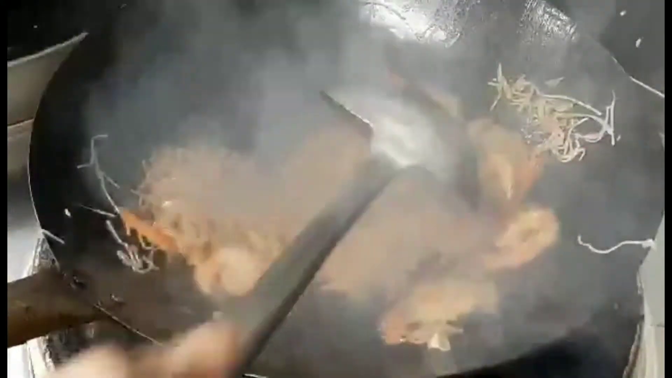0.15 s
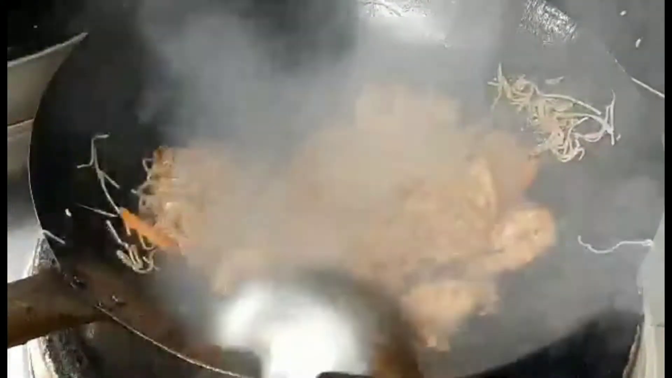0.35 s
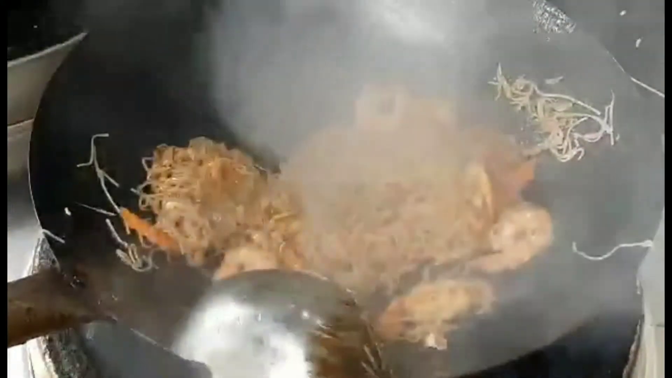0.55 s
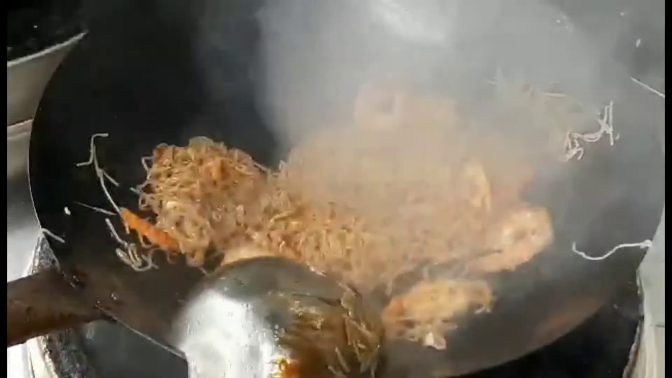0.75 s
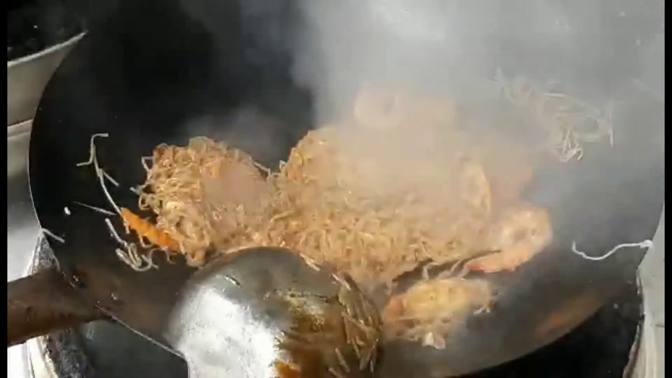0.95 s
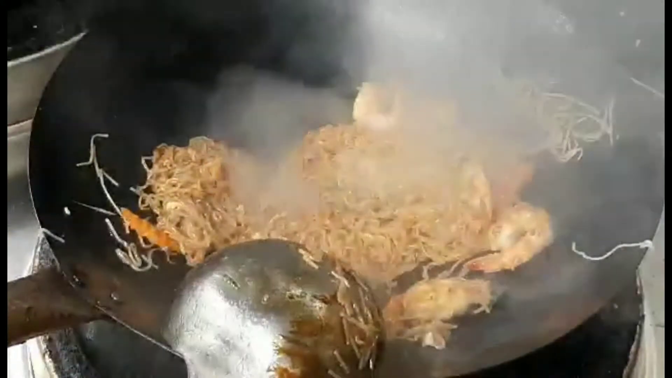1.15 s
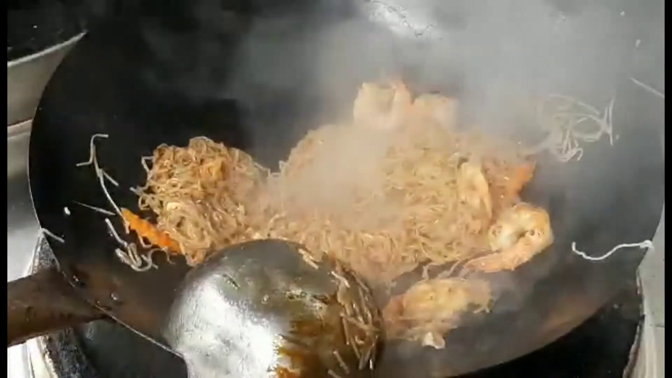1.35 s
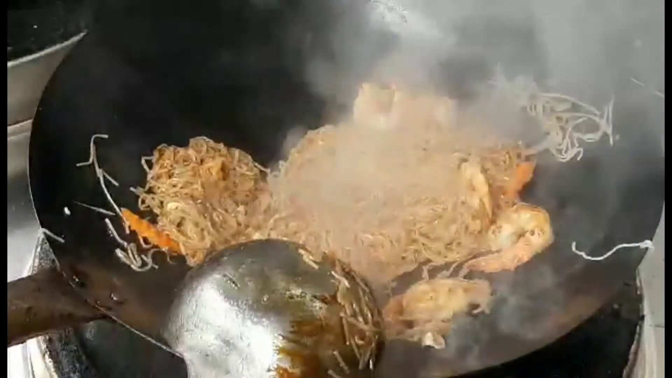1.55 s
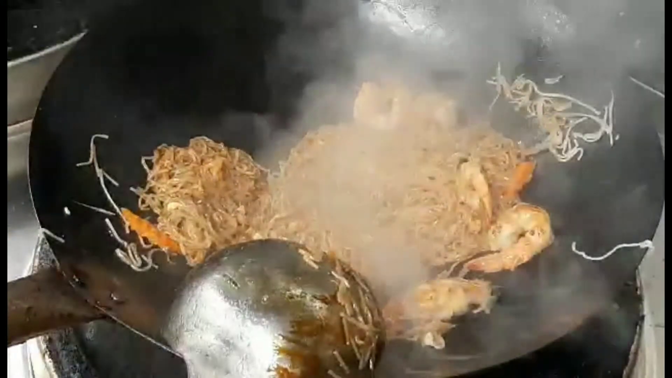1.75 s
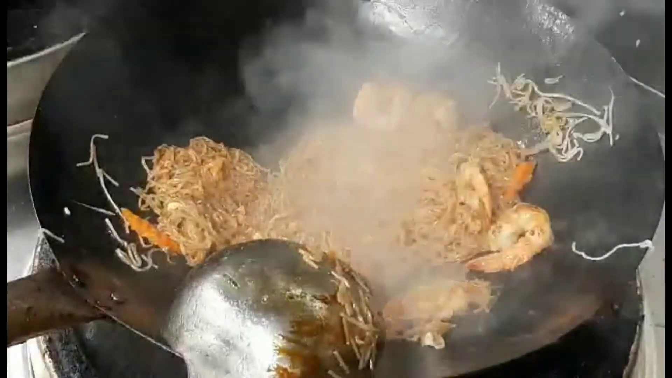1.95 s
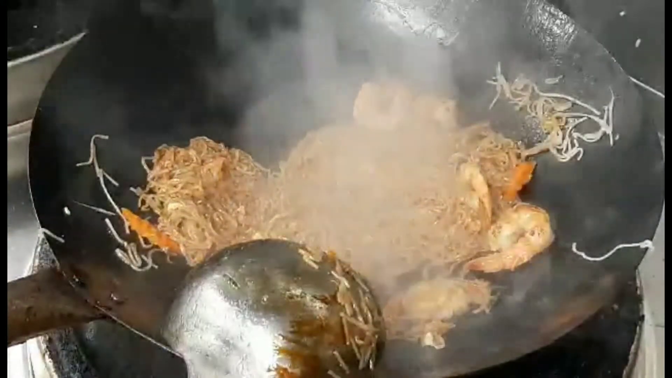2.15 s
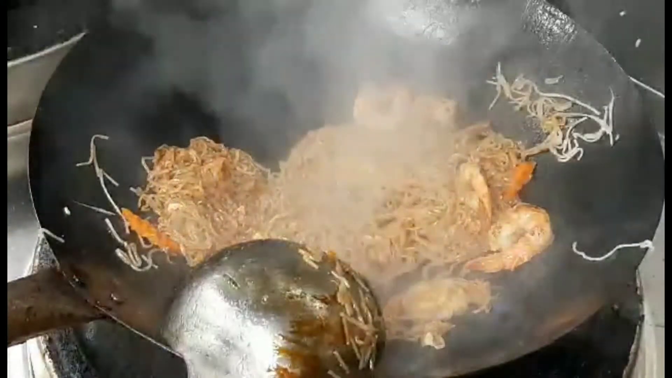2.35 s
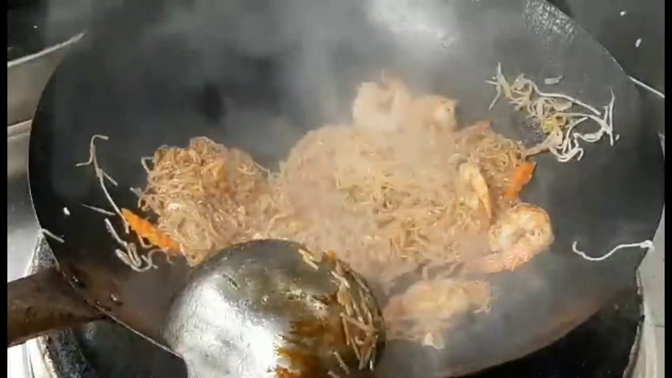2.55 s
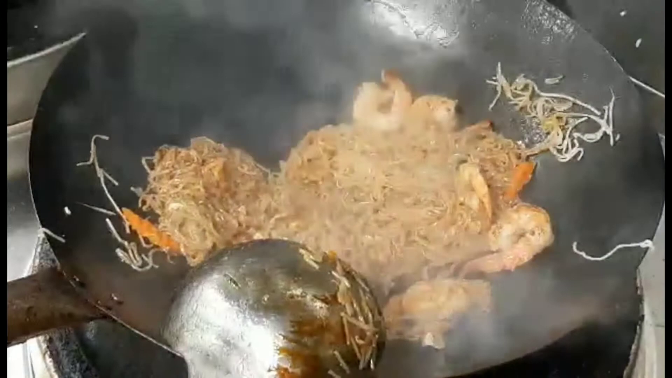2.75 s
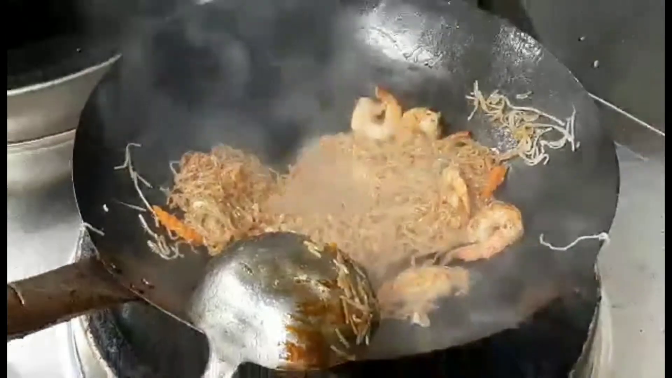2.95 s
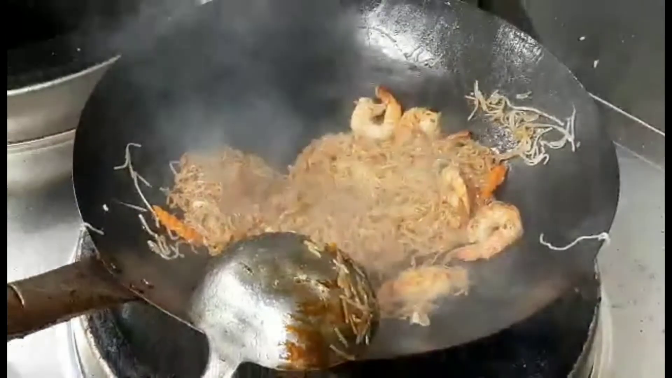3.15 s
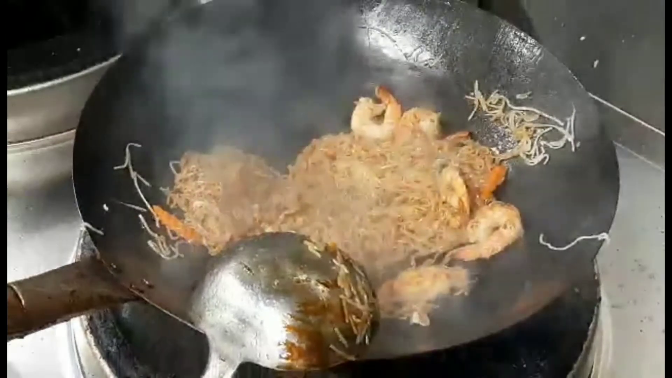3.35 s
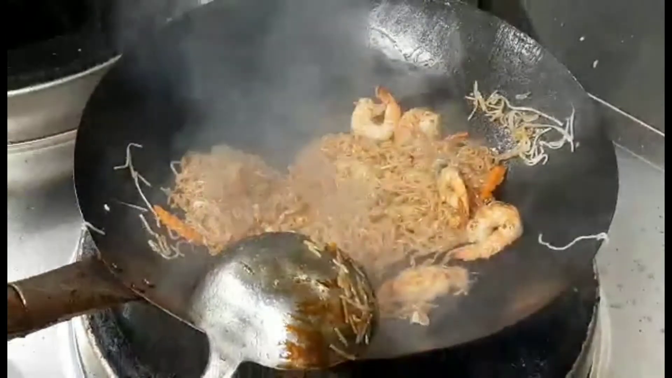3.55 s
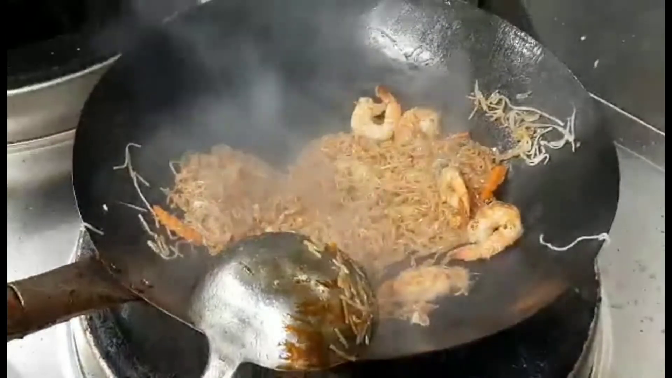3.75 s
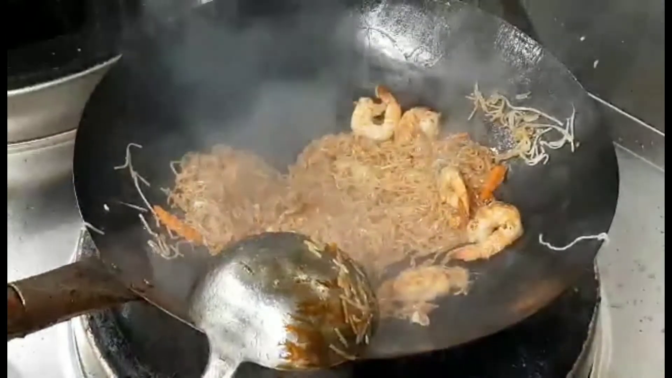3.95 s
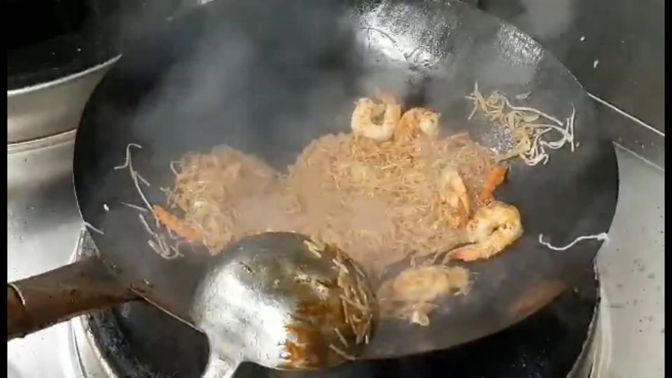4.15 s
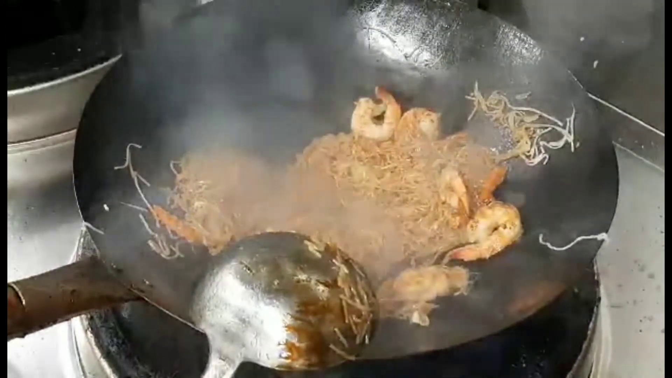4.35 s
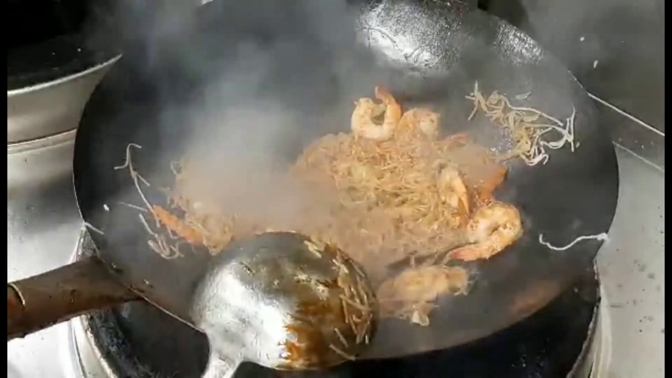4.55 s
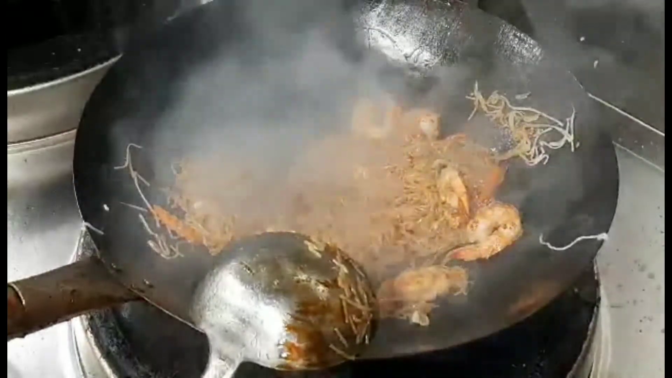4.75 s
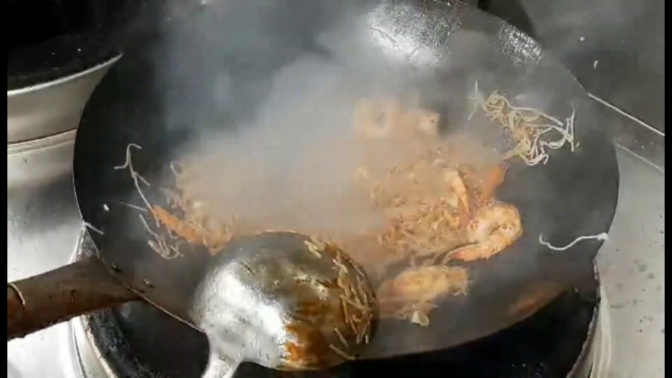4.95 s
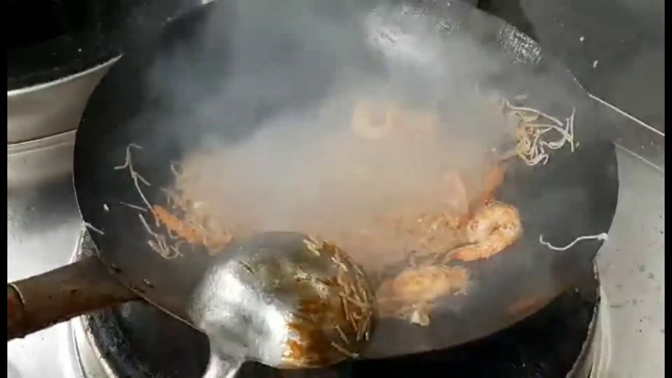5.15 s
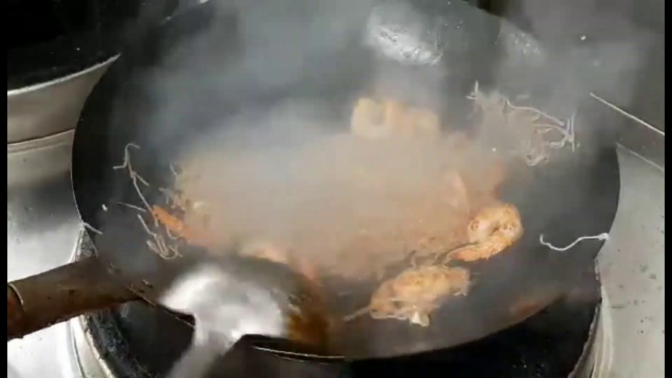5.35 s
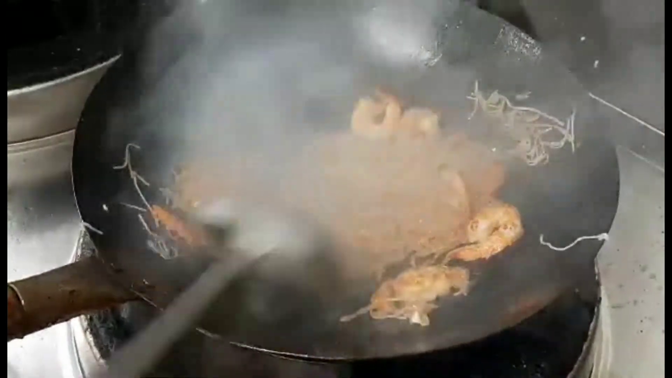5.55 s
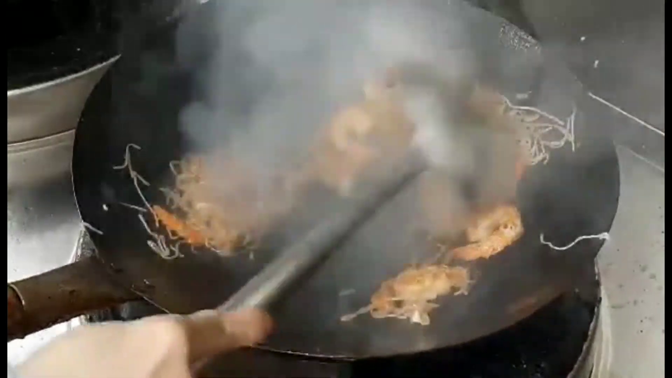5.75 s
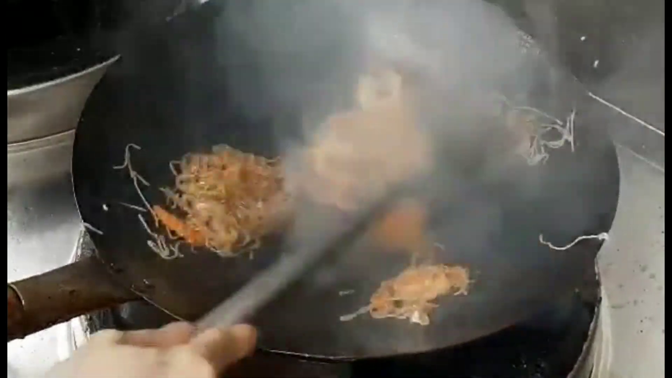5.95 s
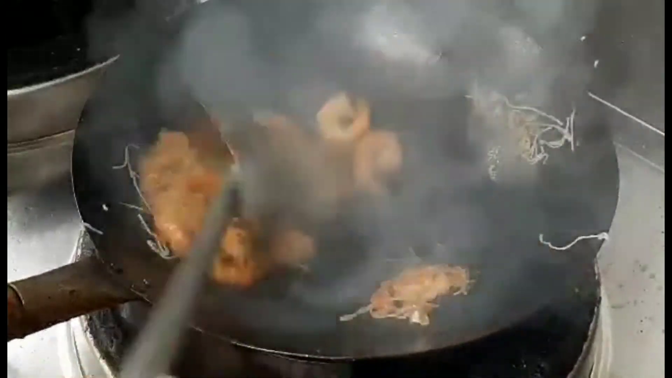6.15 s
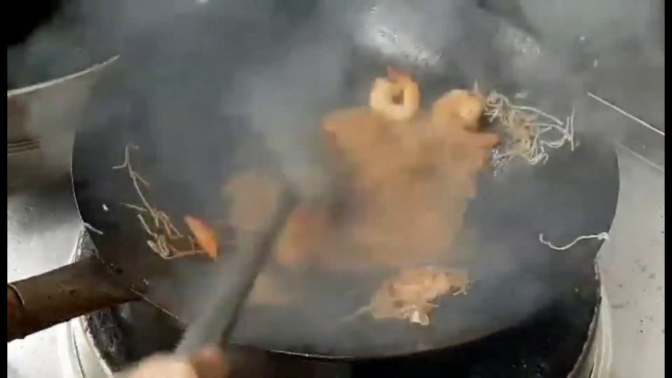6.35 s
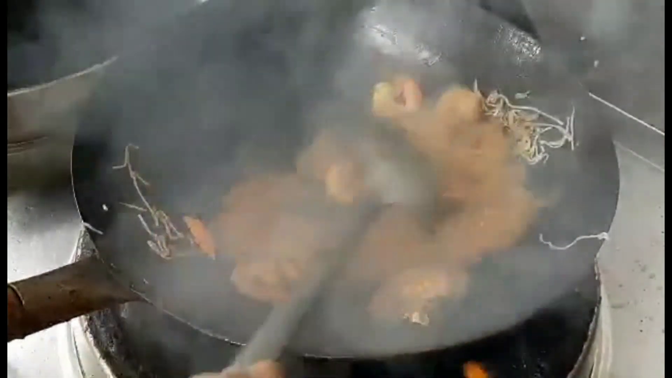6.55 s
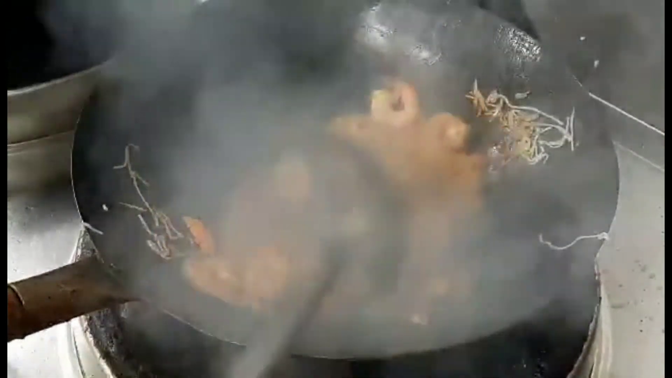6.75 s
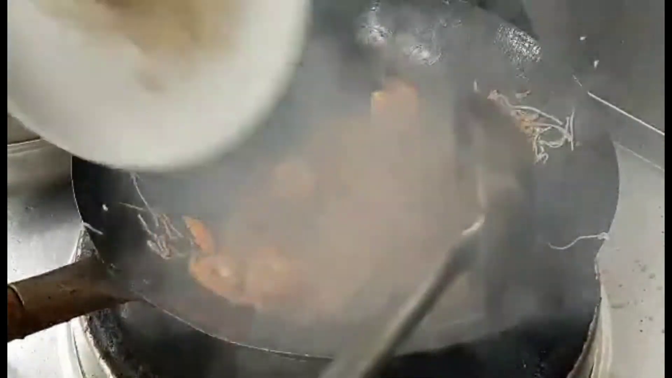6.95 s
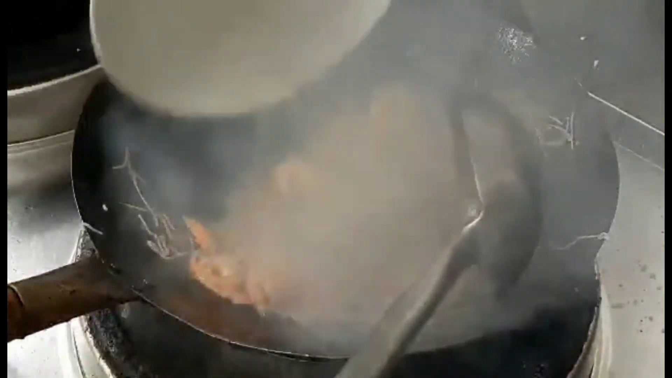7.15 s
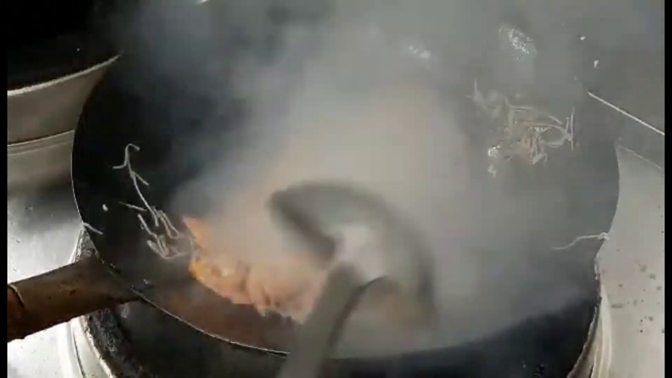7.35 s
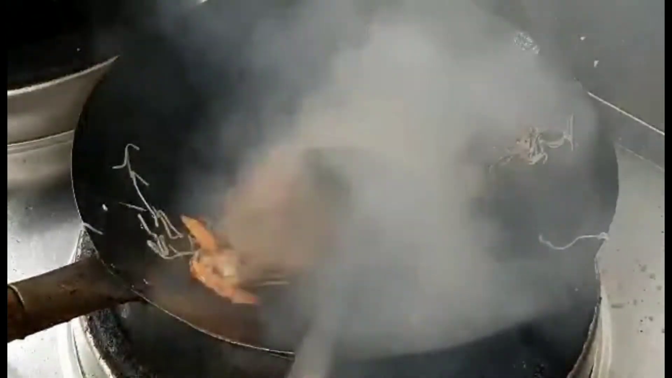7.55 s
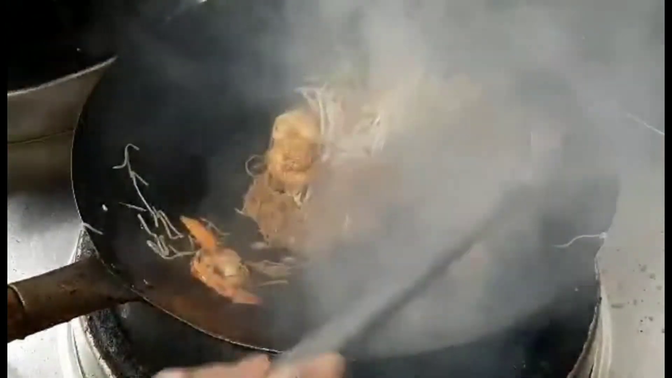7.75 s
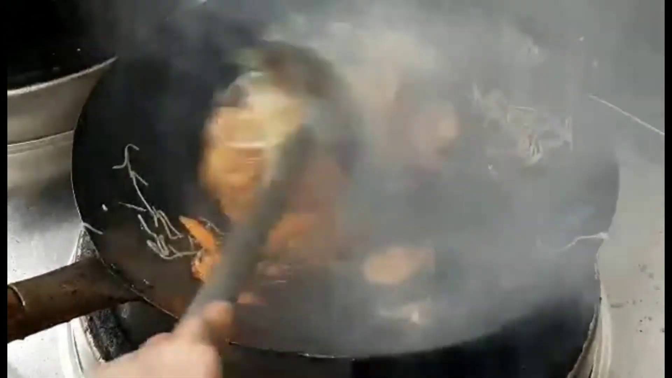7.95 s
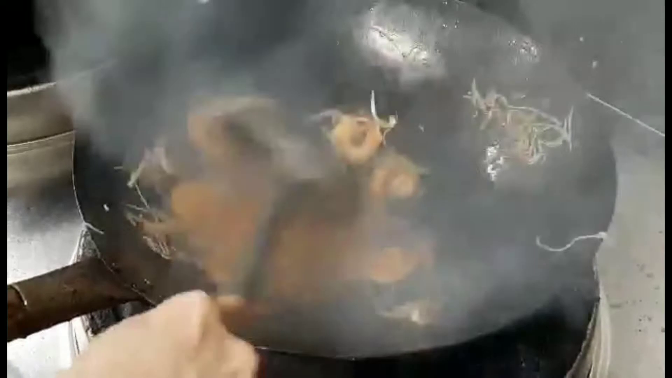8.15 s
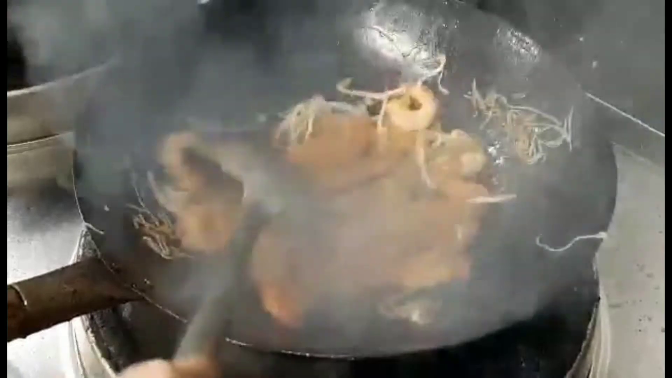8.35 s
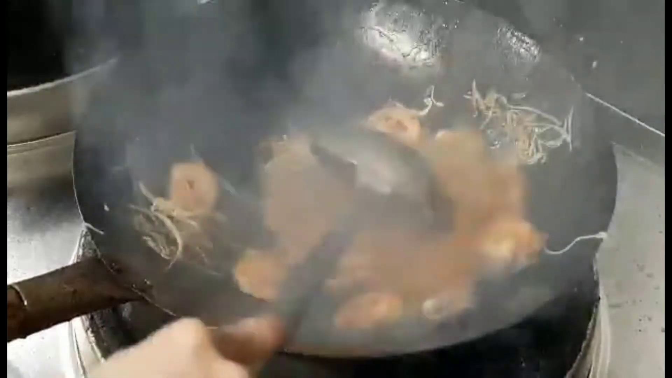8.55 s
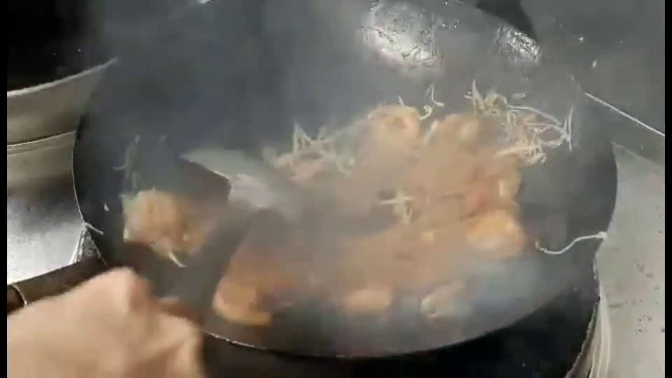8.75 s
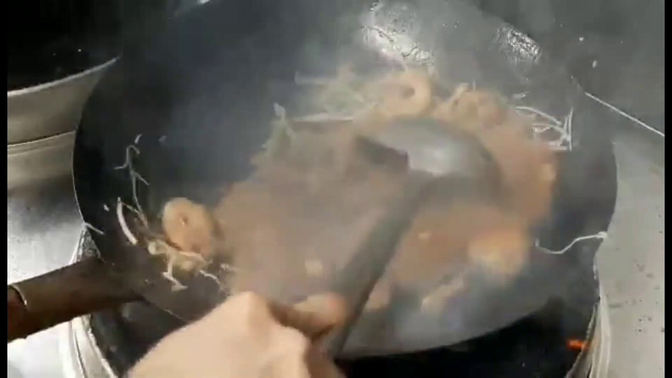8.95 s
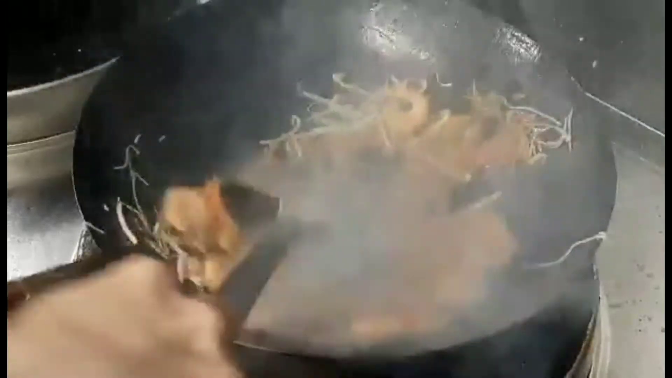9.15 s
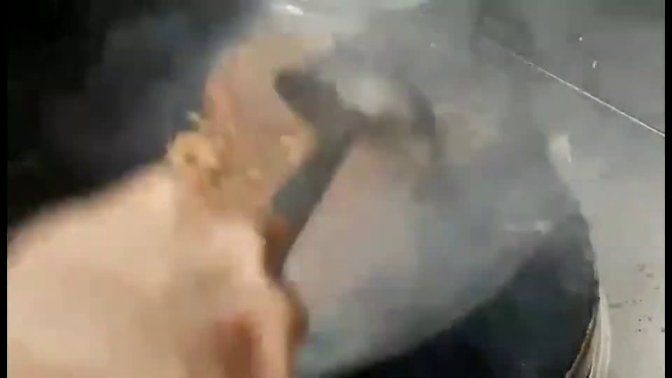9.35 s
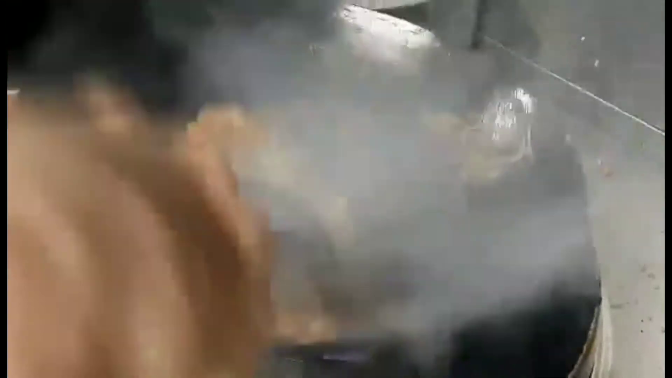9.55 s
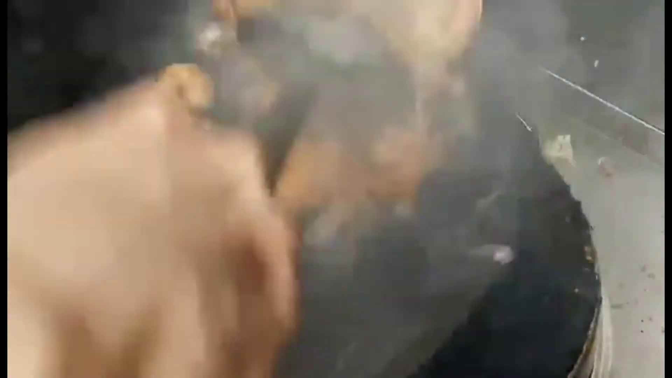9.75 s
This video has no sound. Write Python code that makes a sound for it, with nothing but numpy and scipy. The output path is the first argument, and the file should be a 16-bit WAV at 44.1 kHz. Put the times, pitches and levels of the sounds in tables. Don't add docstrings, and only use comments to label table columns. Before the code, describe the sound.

A gas burner roars and drones under a wok of sizzling noodles and prawns while a metal ladle knocks, scrapes and bumps in bursts.

```python
import sys
import numpy as np
from scipy import signal
from scipy.fft import rfft, irfft
from scipy.io import wavfile
from scipy.ndimage import uniform_filter1d

SR = 44100
rng = np.random.default_rng(int(sys.argv[2]) if len(sys.argv) > 2 else 0)


def digitize_waveform(pressure):
    field = np.atleast_2d(pressure).T
    bounded = np.clip(field, -1, 1)
    quanta = np.round(bounded * 32767).astype(np.int16)
    wavfile.write(sys.argv[1], SR, quanta)


def decibels_to_gain(level_db):
    exponent = np.asarray(level_db, float) / 20
    return 10 ** exponent


N = 431736
FREQS = np.fft.rfftfreq(N, 1 / SR)
TIME = np.arange(N) / SR

# time_s, level_db
DRAUGHT = [
    (0.0, -47),
    (2.1, -44),
    (6.1, -42),
    (6.3, -48),
    (7.1, -39),
    (7.47, -42),
    (7.65, -53),
    (8.34, -46),
    (9.79, -49),
]
# pitch_hz, level_db, fade_60db_s
DISH_NOTES = [(1650, 1, .045), (1950, -1, .04), (2300, 0, .04), (2640, -1, .04), (3150, -4, .03),
              (3600, 3, .035), (3760, 2, .035)]
# start_s, level_db, pitch_hz
BUMPS = [(5.873, -14, 530), (5.89, -11, 516), (7.763, -2.5, 382), (7.768, -10, 378), (8.449, -13, 260),
         (8.469, -9, 300), (9.244, -4, 333), (9.245, -7, 420), (9.247, -5.5, 517), (9.256, -11, 320),
         (9.258, -8, 512), (9.274, 1, 274), (9.292, -4.5, 201), (9.31, -13, 210), (9.371, -10, 348),
         (9.414, -3.5, 200)]
# start_s, length_s, level_db
SCRAPES = [(0.358, 0.056, -22), (0.406, .05, -28), (0.61, 0.057, -26.5), (1.066, 0.1, -33),
           (2.132, 0.036, -33), (4.937, 0.027, -36), (5.385, 0.063, -31), (5.572, 0.055, -33),
           (5.645, .03, -40), (5.705, .06, -34), (5.88, 0.028, -28), (6.1, 0.081, -33), (6.178, .03, -33),
           (6.32, .04, -27), (6.38, 0.037, -31), (6.412, 0.1, -30), (6.5, 0.036, -38), (6.635, .06, -31),
           (6.732, 0.047, -33), (7.115, .03, -34), (7.185, .03, -33), (7.245, 0.066, -34),
           (7.409, .025, -29), (7.43, 0.069, -36), (7.64, .05, -32), (7.746, 0.05, -26),
           (7.785, 0.037, -37), (7.874, 0.027, -36), (7.92, .03, -34), (8.22, 0.067, -29),
           (8.302, 0.066, -30), (8.442, 0.04, -25), (8.557, .05, -36), (8.78, 0.035, -38),
           (8.865, .03, -38), (9.07, .06, -34), (9.248, 0.03, -28), (9.57, .03, -37), (9.655, 0.083, -31)]
# start_s, level_db, bowl_thud_db, strongest_wall_note_hz
BLOWS = [(0.358, -11, -20, 1480), (0.366, -11, -17, 885), (0.384, -19, -14, 796), (0.392, -16, -15, 1410),
         (0.398, -20, -10, 1070), (0.409, -16, -15, 1480), (0.424, -22, -9, 620), (0.618, -18, -16, 1070),
         (0.619, -16, -17, 1850), (0.638, -20, -17, 668), (1.069, -17.5, -1, 620), (1.085, -25, -2, 885),
         (5.339, -15, -12, 940), (5.36, -29, -8, 1070), (5.398, -37, -5, 681), (5.525, -22, -8, 830),
         (5.543, -18, -10, 1070), (5.565, -26, -15, 1200), (5.598, -25, 7.5, 1000), (5.61, -34, -4, 530),
         (5.872, -14.5, -3, 620), (5.873, -19, -13, 990), (5.889, -17.5, -2, 620), (5.89, -25, -15, 930),
         (5.915, -23, 1, 624), (7.409, -20, -3, 880), (7.41, -16, -13, 1450), (7.742, -24, -17, 1480),
         (7.746, -13.5, -1, 715), (7.751, -21, 0, 885), (7.764, -28.5, -1.5, 720), (7.776, -23, 0, 930),
         (8.445, -19, -4, 1480), (9.246, -26, -8, 850)]
# start_s, level_db, strongest_note_hz
LADLE_CLINKS = [(0.357, -15, 3230), (0.358, -13, 4900), (0.37, -21, 4050), (0.367, -13, 2580),
                (0.379, -14, 3300), (0.395, -16, 2800), (0.412, -13.5, 3260), (0.419, -18, 3260),
                (0.43, -20, 3060), (0.618, -19, 3290), (0.622, -18, 2620), (0.638, -18, 3650),
                (5.335, -25, 3650), (5.388, -29, 2970), (5.578, -22, 2620), (5.597, -21, 3000),
                (5.873, -18, 2620), (5.876, -22, 3470), (5.89, -14, 3400), (6.18, -21, 4050),
                (7.409, -18, 2800), (7.411, -17, 4050), (7.42, -15, 3620), (7.5, -25, 3470),
                (7.746, -15, 3300), (7.75, -15, 2470), (7.762, -13.5, 3450), (7.777, -20, 3300),
                (7.795, -28, 4050), (8.444, -20, 2620), (8.447, -24, 3500), (8.868, -27, 3900),
                (9.246, -18, 3050), (9.247, -22, 3760), (9.252, -22, 3060), (9.256, -24, 3760),
                (9.28, -21, 3760), (9.573, -22, 3470)]
# pitch_hz, level_db, fade_60db_s
BOWL_NOTES = [(230, -14, 0.069), (260, -13, 0.089), (295, -5, 0.14), (332, 17, 0.11), (387, -10, 0.056),
              (501, 17, 0.077)]
# pitch_hz, level_db, fade_60db_s
WALL_NOTES = [(530, 0, .07), (620, 1, .075), (715, 1, .07), (800, 0, .06), (885, 1, .07), (930, 0, .06),
              (1000, -1, .05), (1070, 0, .06), (1200, -2, .04), (1400, -2, .04), (1480, 0, .045),
              (1850, -3, .035)]
# pitch_hz, level_db, fade_60db_s
LADLE_NOTES = [(2250, -4, .03), (2460, -1, .04), (2620, 0, .045), (2800, 0, .04), (2960, 0, .04),
               (3060, -1, .04), (3260, 2, .05), (3460, 2, .045), (3620, 1, .045), (3760, 0, .035),
               (4050, -1, .035), (4570, -3, .025), (4900, -2, .025), (5550, -6, .02)]
# time_s, contact_0_resting_1_freshly_turned
CONTACT = [(0.0, 0.61), (0.5, 0.22), (1.0, 0.12), (5.0, 0.04), (5.53, 0.17), (5.6, 0.52), (6.0, 0.51),
           (6.4, 0.87), (6.7, 0.77), (7.03, 0.48), (7.55, 0.41), (7.77, 1), (7.93, 0.64), (8.4, 0.79),
           (9.29, 0.84), (9.41, 0.2), (9.7, 0.9), (9.79, 0.29)]
# start_s, length_s, level_over_hiss_db
SPITS = [(2.12, 0.036, 1), (5.63, 0.053, 2.5), (5.71, .06, 1.5), (5.823, .03, 0), (5.882, 0.052, 4),
         (5.943, .04, 1.5), (6.72, .05, -0.5), (7.62, .04, 1), (7.876, 0.025, 0), (8.016, 0.035, -1),
         (8.174, .03, -0.5), (8.245, .03, 3), (9.253, .03, 4), (9.36, 0.15, -1.5), (9.656, 0.054, 0.5)]
# frequency_hz, level_db_per_hz
FIZZ = [(1500, -22), (2500, -7.5), (4000, 2.5), (6000, 2.5), (8150, 4.5), (8450, -1.5), (9500, 2),
        (11500, 6), (12500, 8), (14000, -15)]
# frequency_hz, level_db_per_hz
ROAR = [(35, -69), (60, -43), (95, -2), (115, -4.5), (172, -13), (232, -11.5), (306, -16), (348, -16.5),
        (396, -10), (495, -19.5), (757, -25.5), (878, -22.5), (5000, -39), (6500, -43.5), (11000, -120)]
# frequency_hz, width_hz, level_over_roar_db
HOOD = [(151, 16, 4), (205.4, 15, 3), (231.5, 9.3, 8), (266.6, 4.6, 8), (312, 8.3, 7), (459, 9.2, 3.5),
        (582, 7.7, 1), (671.5, 32, 6.5), (758.7, 13, 11), (1205, 7.6, 6.5), (1480, 48, 3.5), (2030, 113, 2),
        (3500, 200, 5.5)]
# time_s, level_db
FLOW = [
    (0.0, -30.5),
    (1.0, -30.5),
    (1.3, -29.5),
    (5.4, -30),
    (6.74, -31.5),
    (7.3, -30.5),
    (8.13, -32),
    (9.79, -31.5),
]
# start_s, length_s, level_db
LOW_SURGES = [(0.039, 0.2, -18), (0.334, 0.04, -20), (0.49, 0.051, -11.5), (0.555, .06, -19),
              (0.664, 0.11, -16), (0.843, 0.077, -16.5), (1.348, 0.06, -23), (1.555, 0.2, -31),
              (1.893, 0.25, -24), (2.21, 0.077, -17.5), (2.316, 0.21, -20), (2.585, 0.41, -16.5),
              (3.012, 0.11, -18), (3.525, 0.057, -12), (3.607, 0.051, -18), (3.762, 0.13, -18),
              (3.916, 0.13, -16), (4.062, 0.15, -20), (4.459, 0.068, -19), (4.613, 0.36, -23.5),
              (5.265, 0.031, -12), (5.34, 0.079, -20), (5.455, 0.098, -9.5), (5.585, .145, -18.5),
              (5.84, 0.22, -16.5), (6.167, 0.16, -19), (6.604, 0.3, -16.5), (7.532, 0.032, -12),
              (7.66, 0.087, -17.5), (7.797, 0.14, -13.5), (8.067, 0.097, -18), (8.582, 0.28, -19),
              (9.531, 0.037, -16)]
# start_s, length_s, level_db
UPPER_SURGES = [(0.195, 0.12, -25), (0.35, 0.069, -18.5), (0.634, 0.14, -29.5), (1.017, 0.1, -31),
                (1.32, 0.11, -25), (1.5, 0.1, -21), (2.104, 0.12, -24), (2.741, 0.52, -27),
                (3.286, 0.16, -24.5), (3.836, 0.21, -24.5), (4.463, 0.11, -24), (4.68, 0.22, -26.5),
                (5.333, 0.1, -26), (5.524, 0.32, -27.5), (5.878, 0.12, -24.5), (6.462, 0.2, -27),
                (6.875, 0.297, -27), (7.219, 0.11, -26), (7.602, 0.055, -23), (7.739, 0.14, -24.5),
                (8.22, 0.042, -23.5), (8.903, 0.075, -22.5), (9.226, 0.083, -23)]
# frequency_hz, side_minus_mid_db
SIDE_DB = [(60, -23), (110, -28), (200, -19), (370, -11.5), (670, -5), (1100, -1), (2250, -4), (3600, 0),
           (14000, 0)]
# frequency_hz, left_minus_right_db
PORTS = [(60, 0.0), (110, 0.0), (200, -0.5), (370, 0.5), (670, -0.5), (1230, 1.0), (2250, 0.0), (4110, 0.0),
         (7520, 0.0), (13800, -1.0)]


def unit(x):
    return x / np.sqrt(np.mean(x ** 2))


def shape(points):
    hz, db = np.transpose(points)
    return decibels_to_gain(np.interp(np.log(FREQS + 1), np.log(hz), db))


def peak(hz, width):
    return 1 / (1 + 1j * (FREQS ** 2 - hz ** 2) / (width * (FREQS + 1)))


def diffuse(gain, excite=None):
    if excite is None:
        excite = rng.standard_normal((2, N))
    mid, side = rfft(excite)
    side = side * shape(SIDE_DB)
    return unit(irfft(gain * np.array([mid + side, mid - side]), N))


def walk(rate):
    hold = int(SR / rate)
    steps = np.repeat(rng.standard_normal(N // hold + 1), hold)
    return unit(uniform_filter1d(uniform_filter1d(steps, hold), hold)[:N])


def curve(table):
    time_s, value = np.transpose(table)
    return np.interp(TIME, time_s, value)


def gate(start_s, length_s, edge_s):
    return np.clip(np.minimum(TIME - start_s, start_s + length_s - TIME) / edge_s + .5, 0, 1)


def drone(hz, wander_hz, rate):
    return np.sqrt(2) * np.sin(2 * np.pi * np.cumsum(hz + wander_hz * walk(rate)) / SR)


def ring(modes, t, spot_hz=None):
    hz, db, t60 = np.transpose(modes)[:, :, None]
    chance = rng.standard_normal((4, len(modes), 1))
    hz = hz * (1 + 0.004 * chance[0])
    if spot_hz:
        db = db - 9 * np.minimum(abs(np.log2(hz / spot_hz)) / 0.08, 1)
    sides = np.array([1, -1])[:, None, None]
    skew = sides * np.sign(chance[1]) * np.minimum(hz / 3000, .75) + chance[3]
    fade = 1000 ** (-t / np.minimum(t60, .15))
    waves = decibels_to_gain(db + 2.0 * chance[2]) * np.sin(2 * np.pi * hz * t + skew) * fade
    return waves.sum(axis=1) / np.sqrt(len(modes))


def draught():
    puffs = decibels_to_gain(-6.5) * drone(36, 2.24, rate=4.9)
    rumble = decibels_to_gain(-2.5) * diffuse(peak(50, 40) ** 2)
    return decibels_to_gain(curve(DRAUGHT)) * (puffs + rumble)


def fan():
    covered_s = 6.1
    level_db = np.interp(TIME, [covered_s, covered_s + .4], [-44.5, -46.5])
    return decibels_to_gain(level_db + 1.5 * walk(3)) * drone(559, 0.84, rate=3)


def dish():
    start_s, level_db, attack_s = 4.029, -12, 0.00073
    out, t = np.zeros((2, N + SR)), TIME[:SR // 4]
    clink = ring(DISH_NOTES, t) * (1 - np.exp(-t / attack_s))
    out[:, int(start_s * SR):][:, :len(t)] += decibels_to_gain(level_db) * clink
    return out


def bumps():
    attack_s, t60_s = 0.0035, 0.042
    start_s, db, hz = np.transpose(BUMPS)[:, :, None]
    t = np.clip(TIME - start_s, 0, 1)
    overtone = decibels_to_gain(-17) * np.sin(2 * np.pi * 1.77 * hz * t)
    tone = np.sin(2 * np.pi * hz * t) + overtone
    knocks = decibels_to_gain(db) * tone * (1 - np.exp(-t / attack_s)) * 1000 ** (-t / t60_s)
    return knocks.sum(axis=0)


def scrapes():
    rasp_hz, rasp_width_hz, note_width_hz, between_notes_db = 3260, 4600, 87, -6
    grit = rng.standard_normal((2, N)) * decibels_to_gain(2.5 * rng.exponential(size=N))
    stroke = np.zeros(N)
    for start_s, length_s, db in SCRAPES:
        fade = np.clip(1 - ((TIME - start_s) / length_s) ** 2, 0, 1)
        stroke += decibels_to_gain(db) * (TIME > start_s) * fade
    power = decibels_to_gain(between_notes_db) ** 2
    for hz, db, _ in WALL_NOTES + LADLE_NOTES:
        power = power + decibels_to_gain(db) ** 2 * abs(peak(hz, note_width_hz)) ** 2
    colour = peak(rasp_hz, rasp_width_hz) * np.sqrt(power)
    return stroke * decibels_to_gain(2.05 * walk(60)) * diffuse(colour, grit)


def ladle():
    touch_s, chatter_s = 0.0012, 0.0043
    out, t = np.zeros((2, N + SR)), TIME[:SR // 4]
    strikes = [(s, db + 1.0, WALL_NOTES, hz) for s, db, _, hz in BLOWS]
    strikes += [(s, db + thud_db, BOWL_NOTES, hz / 2) for s, db, thud_db, hz in BLOWS]
    strikes += [(s, db, LADLE_NOTES, hz) for s, db, hz in LADLE_CLINKS]
    for start_s, db, modes, spot_hz in strikes:
        chatter = 0.047 * rng.standard_normal(len(t)) * np.exp(-t / chatter_s)
        chatter[0] = 0.84
        ringing = ring(modes, t, spot_hz) * (1 - np.exp(-t / touch_s))
        blow = signal.fftconvolve(ringing, chatter[None], axes=1)
        out[:, int(start_s * SR):][:, :blow.shape[1]] += decibels_to_gain(db) * blow / abs(blow).max()
    return out


def in_kitchen(knocks):
    fade_60db_s, level_db = 0.66, -36.0
    fade = 1000 ** (-TIME[:SR // 2] / fade_60db_s)
    walls = rng.standard_normal((2, SR // 2)) * fade * decibels_to_gain(level_db)
    heard = knocks[:, :N] + signal.fftconvolve(knocks, walls, axes=1)[:, :N]
    return signal.sosfilt(signal.butter(4, 170, "high", fs=SR, output="sos"), heard)


def food():
    contact = curve(CONTACT)
    spit_db = sum(db * gate(s, length, edge_s=.012) for s, length, db in SPITS)
    hiss_db = -34.5 + 7 * contact + spit_db
    fat_db = -42.5 + 16 * contact
    bursts = rng.standard_normal((2, 2, N)) * decibels_to_gain(2.1 * rng.exponential(size=(2, 1, N)))
    fizz, tiny = rfft(diffuse(shape(FIZZ), bursts[0])), peak(15700, 7300)
    larger_bubbles = irfft(fizz * (1 - tiny), N) * decibels_to_gain(.8 * walk(35))
    tiny_bubbles = irfft(fizz * tiny, N) * decibels_to_gain(1.7 * walk(30))
    hiss = decibels_to_gain(hiss_db + 0.56 * walk(36)) * (larger_bubbles + tiny_bubbles)
    fat = decibels_to_gain(fat_db + 2.6 * walk(22)) * diffuse(peak(3080, 2500), bursts[1])
    return hiss + fat


def surging(table, idle_db):
    power = decibels_to_gain(idle_db + 1.5 * walk(11)) ** 2
    for start_s, length_s, db in table:
        power = power + decibels_to_gain(db) ** 2 * gate(start_s, length_s, edge_s=0.028) ** 2
    return 10 * np.log10(power)


def burner():
    resonances = sum(decibels_to_gain(db) ** 2 * abs(peak(hz, width)) ** 2 for hz, width, db in HOOD)
    colour = shape(ROAR) * np.sqrt(1 + resonances)
    roar = decibels_to_gain(7.5 + curve(FLOW) + 0.45 * walk(14)) * diffuse(colour)
    low = decibels_to_gain(-5.0) * drone(116, 3.58, rate=16) + decibels_to_gain(-13.0) * diffuse(peak(122.0, 33) ** 2)
    low = low * decibels_to_gain(surging(LOW_SURGES, idle_db=-24))
    upper = decibels_to_gain(-5.5) * drone(408, 4.95, rate=22) + decibels_to_gain(-6.5) * diffuse(peak(392.9, 28.0) ** 2)
    upper = upper * decibels_to_gain(surging(UPPER_SURGES, idle_db=-31))
    return roar + low + upper


def scene():
    both = draught() + fan() + bumps() + scrapes() + in_kitchen(ladle() + dish()) + food() + burner()
    tilt = np.sqrt(shape(PORTS))
    left, right = irfft(rfft(both) * np.array([tilt, 1 / tilt]), N)
    return np.array([np.roll(left, shift=1), right])


def band_limit(x):
    return signal.sosfilt(signal.butter(12, 13150, fs=SR, output="sos"), x)


def record(dry):
    mix = np.tanh(0.95 * dry) / 0.85
    return band_limit(mix)


dry = scene()
out = record(dry)
digitize_waveform(out)
```